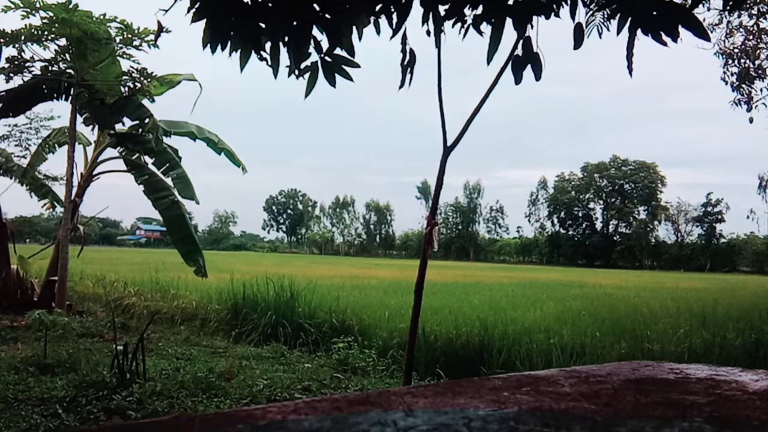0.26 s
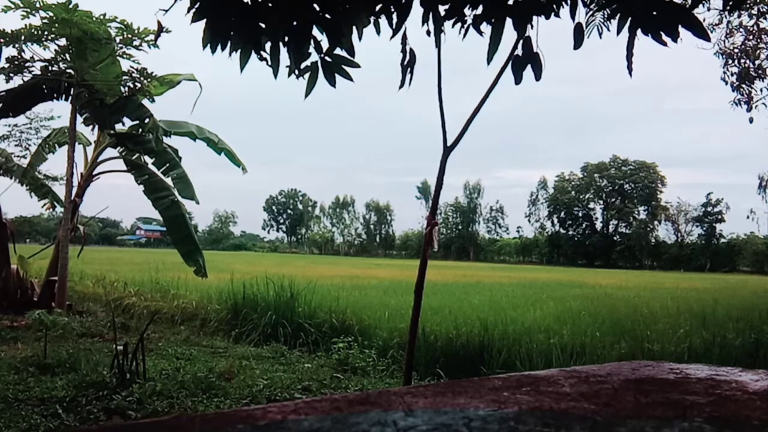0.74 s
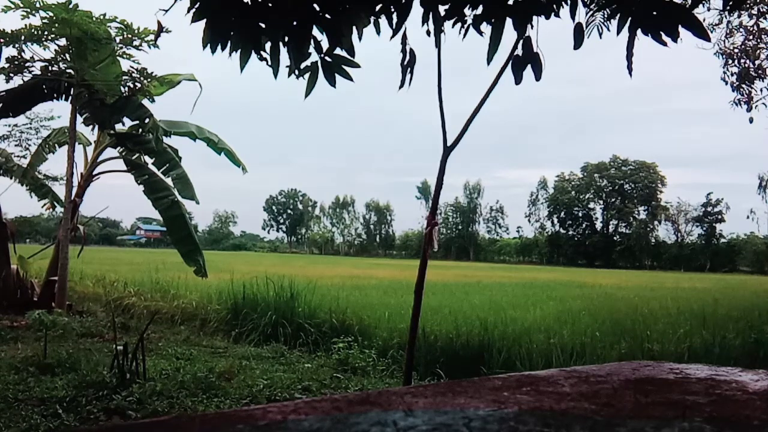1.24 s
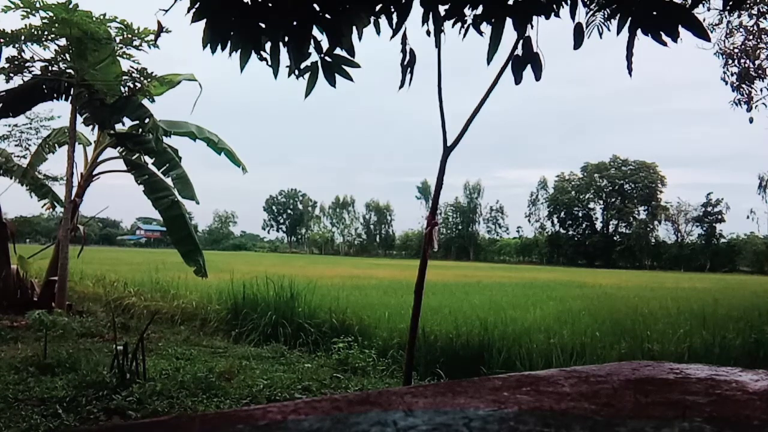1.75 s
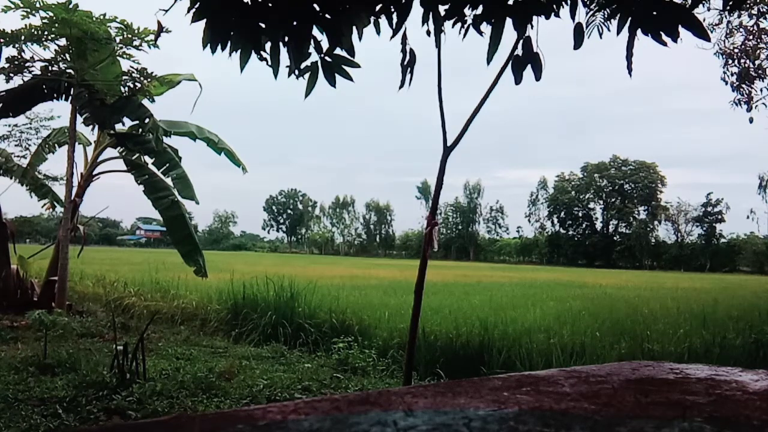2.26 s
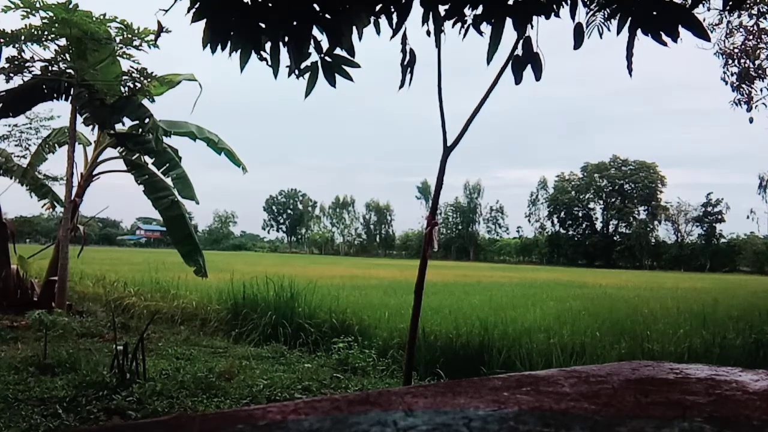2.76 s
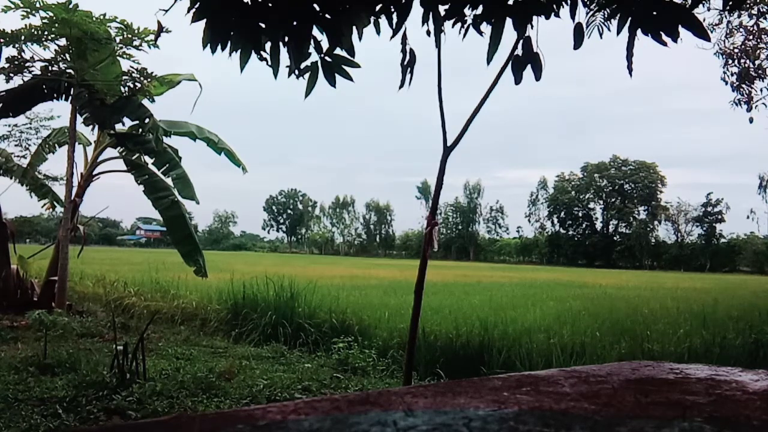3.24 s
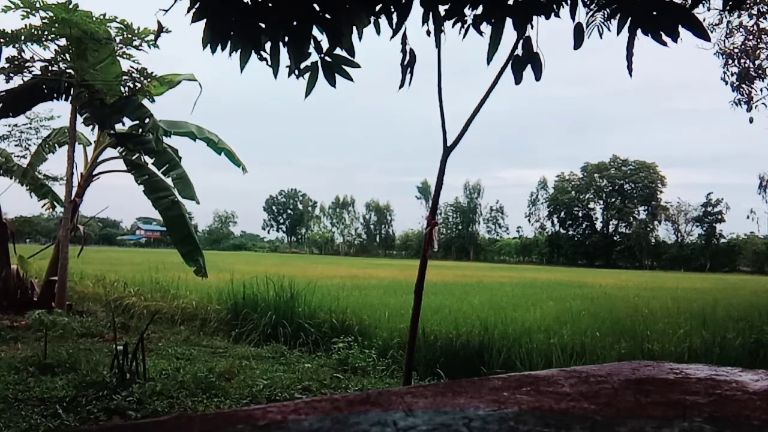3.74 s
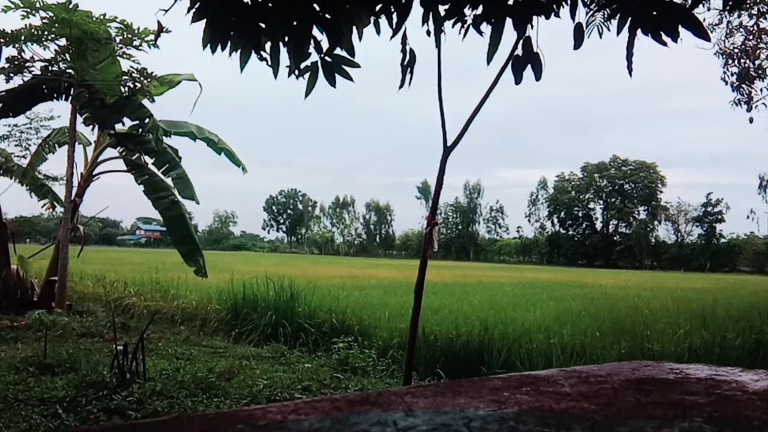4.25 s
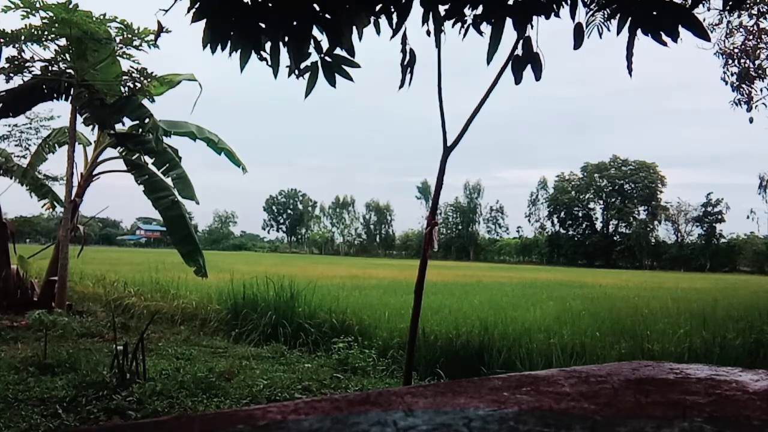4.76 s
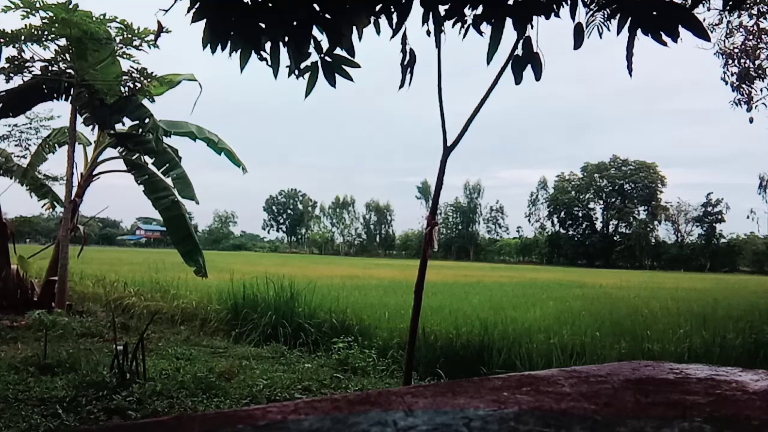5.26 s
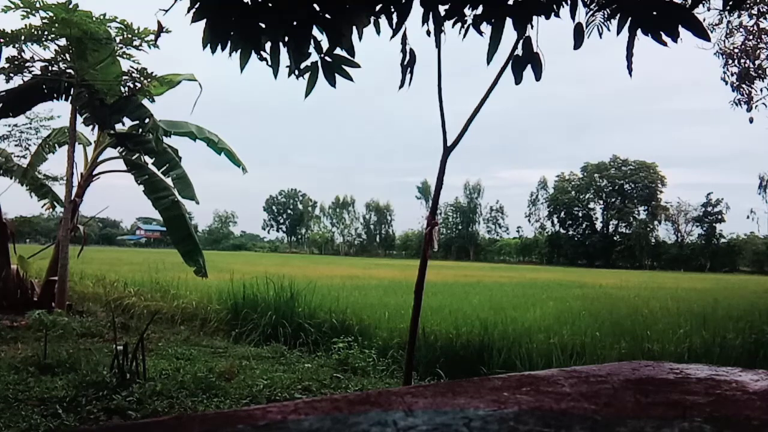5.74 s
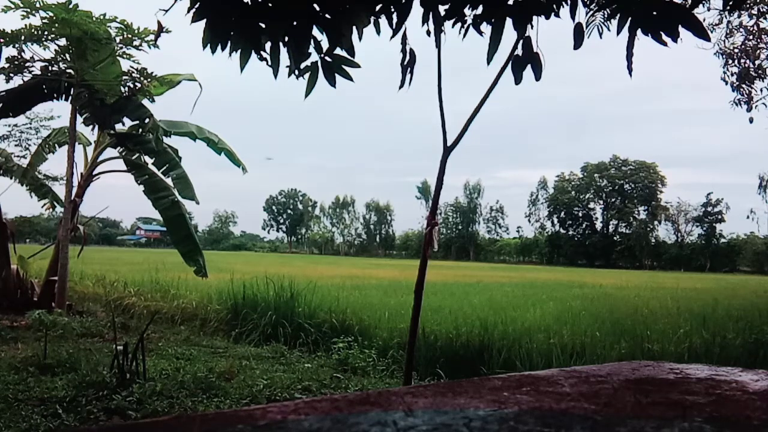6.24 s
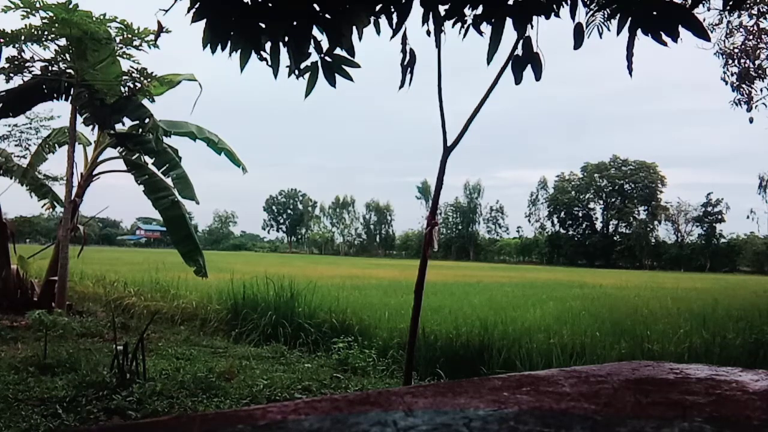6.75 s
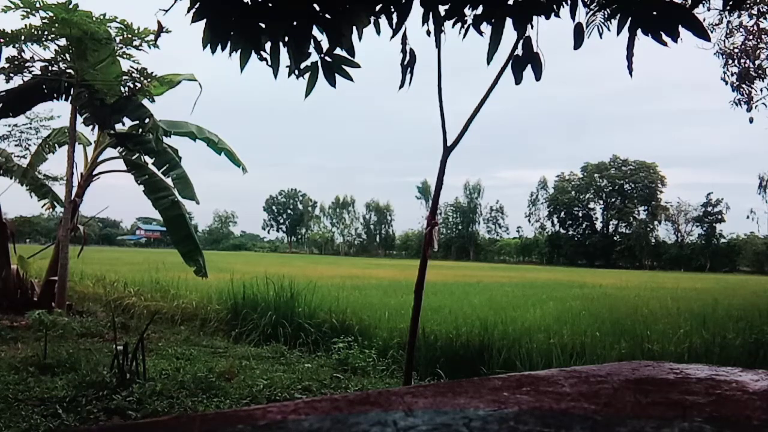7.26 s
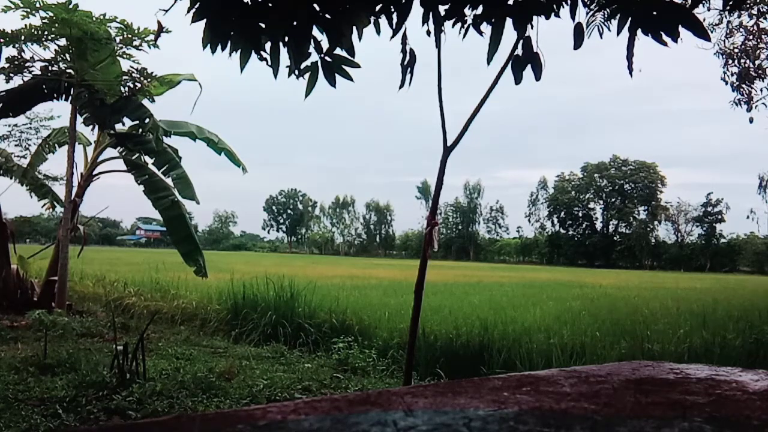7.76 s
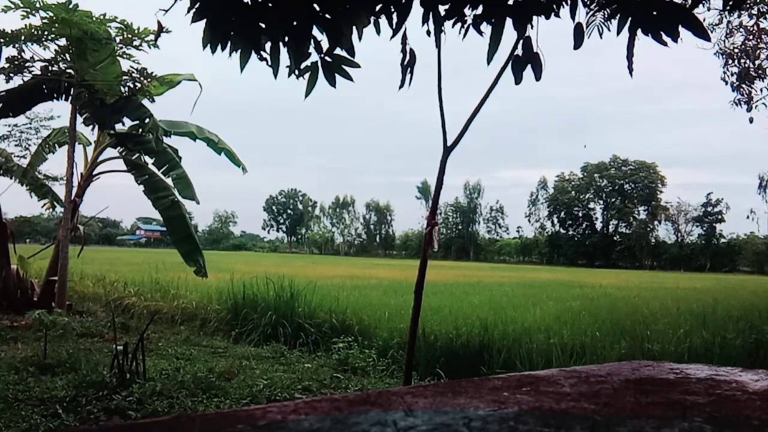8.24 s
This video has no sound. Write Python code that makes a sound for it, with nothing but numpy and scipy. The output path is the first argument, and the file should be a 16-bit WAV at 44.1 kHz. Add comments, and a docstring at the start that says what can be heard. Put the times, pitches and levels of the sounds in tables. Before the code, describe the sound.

Whooping bird runs break into loud cries while a near bird chirps repeatedly, insects shimmer, distant birds chatter and hoarse clucks join to the end.

```python
"""Morning at the edge of a rice field: filtered noise for air and insects, a wavering tone for a far engine.
From the start a bird whoops in a slowing run of swept tones, far birds whistle and chatter (noise bands),
and a near bird begins its rough three-step chirps. Cries end the run and a cricket trills; then a katydid
throbs and pips lead to a second run and more cries. Thumps and scuffs fall close by, and a clucking bird
joins to the end. Sparse decaying echoes from leaves and tree line scatter the calls."""
import sys
import numpy as np
from scipy import signal
from scipy.fft import rfft, irfft
from scipy.io import wavfile
from scipy.ndimage import map_coordinates

SR = 44100
rng = np.random.default_rng(int(sys.argv[2]) if len(sys.argv) > 2 else 0)


def transcribe(signal):
    """Save signal, clipped to [-1, 1], as a 16-bit WAV file at the path in sys.argv[1]."""
    frames = np.atleast_2d(signal).T
    limited = np.clip(frames, -1, 1)
    pcm = np.round(limited * 32767).astype(np.int16)
    wavfile.write(sys.argv[1], SR, pcm)


N = 374850
TIME = np.arange(N) / SR


def undb(db):
    """Logarithmic level: decibels to amplitude gain."""
    return 10 ** (np.asarray(db) / 20)


def unit(x):
    """Normalisation: scale to rms 1."""
    return x / np.sqrt(np.mean(x ** 2) + 1e-20)


def add(out, s, x):
    """Superposition: mix x into out from time s."""
    i = max(int(s * SR), 0)
    out[i:i + len(x)] += x[:max(len(out) - i, 0)]


def walk(rate, size=N):
    """Band-limited modulation: smooth random wander of spread near 1, with rate knots a second."""
    knots = rng.standard_normal(4096)
    return map_coordinates(knots, [np.arange(size) / SR * rate], order=2, mode="wrap")


def bout(start_s, end_s, fade_s):
    """Trapezoidal envelope: fade in, hold, fade out."""
    return np.clip(np.minimum(TIME - start_s, end_s - TIME) / fade_s, 0, 1)


def coloured(points):
    """Spectral shaping: white noise weighted by a (f/Hz, level/dB) curve, at rms 1."""
    hz, db = np.transpose(points)
    f = np.fft.rfftfreq(N, 1 / SR) + 1e-3  # keeps the logarithm finite at 0 Hz
    gain = undb(np.interp(np.log(f), np.log(hz), db, left=-120, right=-120))
    return unit(irfft(rfft(rng.standard_normal(N)) * gain, N))


def restless(points, sway_db, rate):
    """Independent band modulation: nine log-spaced bands of coloured noise each swell and fade alone."""
    spectrum = rfft(coloured(points))
    f = np.fft.rfftfreq(N, 1 / SR)
    edges = np.geomspace(points[0][0], points[-1][0], 10)
    out = np.zeros(N)
    for low, high in zip(edges, edges[1:]):
        band = irfft(spectrum * ((f >= low) & (f < high)), N)
        out += band * undb(sway_db * walk(rate))
    return unit(out)


def tone(hz):
    """Frequency modulation: a sine whose phase is the integral of a pitch track."""
    return np.sin(2 * np.pi * np.cumsum(hz) / SR)


def scatter(x, t60, wet_db, gap_s, count):
    """Multiple scattering: direct sound plus echoes from leaves and trunks that fall 60 dB over t60."""
    where = rng.random(count)  # delay as a share of t60
    size = rng.standard_normal(count)
    echoes = np.zeros(2 * SR)
    delays = np.clip((gap_s + where * t60) * SR, 1, len(echoes) - 1).astype(int)
    np.add.at(echoes, delays, size * np.exp(-np.log(1000) * where))
    echoes /= np.linalg.norm(echoes)
    return x + undb(wet_db) * signal.fftconvolve(x, echoes)[:len(x)]


def slurs(rows, rough):
    """Frequency glide: whistled notes that bend along a parabola through three pitches."""
    out = np.zeros(N)
    for s, length, start_hz, middle_hz, end_hz, db in rows:
        u = np.linspace(0, 1, int(length * SR))
        hz = np.polyval(np.polyfit([0, .5, 1], [start_hz, middle_hz, end_hz], 2), u)
        whistle = tone(hz * (1 + rough * walk(250, size=len(u))))
        add(out, s, undb(db) * whistle * signal.windows.tukey(len(u), .6))
    return out


def glide(s, length, hz, change, db, bow=.42):
    """Proportional glide: a slur whose pitch changes by a share of itself, slowly at first."""
    return s, length, hz, hz * (1 + bow * change), hz * (1 + change), db


def rasps(rows):
    """Resonance: bursts of noise through one band-pass that swell quickly and fade."""
    out = np.zeros(N)
    for s, length, hz, width_hz, db in rows:
        u = np.linspace(0, 1, int(length * SR))
        edges = [max(hz - width_hz / 2, 30), hz + width_hz / 2]
        band = signal.butter(3, edges, "bandpass", fs=SR, output="sos")
        noise = signal.sosfilt(band, rng.standard_normal(SR))[-len(u):]  # the settled end
        swell = np.sin(np.pi * u ** 0.6) * undb(2.7 * walk(150, size=len(u)))
        add(out, s, undb(db) * unit(noise * swell))
    return out


# noise spectra of low rumble, field murmur and hiss: (f/Hz, relative level/dB per Hz)
LOW_AIR = [(18, -37.5), (30, -19.5), (42, -21), (60, -4.5), (112, -1.5), (160, -2), (190, -6), (235, -7),
           (270, -13.5), (320, -18), (380, -25.5), (600, -36.5)]
FIELD_AIR = [(300, -21), (480, -24.5), (690, 1), (950, 1.5), (1400, -2.5), (1800, -5.5), (2300, 0),
             (2850, 5), (3400, -3.5), (4000, -14.5), (5200, -36)]
HISS = [(4710, -40), (8000, -1), (8670, -6), (9110, -10), (9570, -7), (10700, -2), (12000, -10),
        (15400, -9)]
# drone of the distant engine: (t/s, level/dB of the fundamental before its flutter)
ENGINE = [(0, -59.5), (1.2, -48.5), (2.5, -60.5), (3.2, -51), (4.2, -66), (5.4, -49.5), (6.1, -53.5),
          (7, -49), (8.5, -52.5)]
LOW_DB, MURMUR_DB, HISS_DB = -53, -59.5, -85.5  # rms levels


def background():
    """Harmonic drone over broadband noise: far engine, low rumble, murmur of the field and faint hiss."""
    firing_hz = 116.4 * (1 + 0.03984 * walk(14))
    fundamental = tone(firing_hz) * undb(1.3 * walk(8.2))
    second = undb(-10) * tone(2 * firing_hz) * undb(2.8 * walk(7.7))
    engine = (fundamental + second) * undb(np.interp(TIME, *np.transpose(ENGINE)))
    rumble = restless(LOW_AIR, sway_db=1.3, rate=7) * undb(LOW_DB)
    field = restless(FIELD_AIR, sway_db=4.5, rate=8) * undb(MURMUR_DB)
    return engine + rumble + field + coloured(HISS) * undb(HISS_DB)


# noise spectrum of the insect chorus: (f/Hz, relative level/dB per Hz)
INSECTS = [(2240, -27.5), (3800, -11.5), (3890, -7), (4060, -4), (4530, 1.5), (4700, 5.5), (4910, 2),
           (5360, -19.5), (5560, -25.5), (6210, -23), (6620, -9), (6990, -3.5), (7330, -9), (7760, -46),
           (8500, -35), (11000, -68.5), (18700, -120)]
# gains before the stroke envelopes (the chorus also wavers)
INSECT_DB, KATYDID_DB, CRICKET_DB = -60.5, -88.5, -58.5


def insects():
    """Amplitude modulation by wing strokes: shrill chorus, throbbing katydid, one brief cricket trill."""
    chorus = coloured(INSECTS) * undb(INSECT_DB + 1.7 * walk(7) + 1.6 * walk(45))
    throb = np.abs(tone(4.15 * (1 + 0.023 * walk(5))))  # two wing strokes a cycle
    katydid = coloured([(7900, -1), (8900, 9.0), (9800, -11.0)]) * throb * undb(2 * walk(7.3))
    katydid *= undb(KATYDID_DB) * bout(start_s=2.5, end_s=5.8, fade_s=0.21)
    strokes = tone(14 * (1 + 0.03 * walk(6.7))) ** 2  # squaring doubles the rate too
    cricket = coloured([(4100, -23), (4450, 4), (4800, -11)]) * strokes
    cricket *= undb(CRICKET_DB) * bout(start_s=1.47, end_s=2, fade_s=.07)
    return chorus + katydid + cricket


def flock(low_hz, high_hz, bend, spread_db, count):
    """Diffuse field: many far birds as short slurs at random times and pitches, mostly echo, at rms 1."""
    rows = []
    for when, pitch, length, start, end, size in rng.random((count, 6)):
        hz = low_hz + (high_hz - low_hz) * pitch
        start_hz = hz * (1 + bend * (start - .5))
        end_hz = hz * (1 + bend * (end - .5))
        rows.append((when * N / SR, 0.0308 + 0.0838 * length, start_hz, hz, end_hz, spread_db * size))
    return unit(scatter(slurs(rows, rough=0.019), t60=.55, wet_db=6.5, gap_s=.01, count=1000))


# Levels in these four tables are before echoes and group gain.
# thin falling whistles: (t/s, length/s, start f/Hz, level/dB)
FALLING = [(0.074, 0.14, 3820, -56.5), (1.019, 0.19, 3860, -60), (1.869, 0.21, 3830, -62.5),
           (2.514, 0.2, 3840, -68), (3.491, 0.084, 3950, -58.5), (6.095, .22, 2455, -63),
           (6.521, 0.25, 2434, -60.5), (7.736, 0.12, 3540, -53)]
# rising whistles: (t/s, start f/Hz, level/dB)
RISING = [(3.86, 2230, -54), (4.13, 2240, -50.5), (4.44, 2326, -52.5), (4.6, 2970, -59), (6.93, 3120, -62),
          (8.32, 2870, -56.5)]
# roosters on far farms, only the strongest overtone carries: (t/s, length/s, start f/Hz, level/dB)
CROWS = [(1.02, .36, 866, -63), (5.08, 0.59, 1510, -73.5), (6.848, 0.43, 672, -64)]
# harsh chatter in the trees; the row near 8 s is a rasping tail of the near bird's last chirp: # (t/s,
# length/s, centre f/Hz, level/dB)
CHATTER = [(.52, 0.7, 810, -64), (0.817, 0.069, 2660, -55), (1.397, 0.29, 1380, -61),
           (3.537, 0.053, 2560, -58.5), (3.657, 0.12, 2730, -61.5), (3.764, 0.023, 2170, -53.5),
           (4.699, 0.064, 3380, -50.5), (5.605, .081, 3440, -57.5), (6.308, 0.048, 3340, -52),
           (6.666, .11, 3140, -53.5), (7.525, 0.21, 3250, -58), (8.008, .075, 2780, -56.5)]
WHISTLE_FALL, WHISTLE_RISE, CROW_SAG = 0.067, .22, 0.021  # shares of the start pitch
RISING_S = .165  # length of a rising whistle
CHATTER_WIDTH = 0.41  # bandwidth as a share of the centre frequency


def far_birds():
    """Reverberant blurring: whistles, crows and chatter behind the tree line, over a further chorus."""
    falling = [glide(s, length, hz, -WHISTLE_FALL, db) for s, length, hz, db in FALLING]
    rising = [glide(s, RISING_S, hz, WHISTLE_RISE, db) for s, hz, db in RISING]
    held = [glide(s, length, hz, -CROW_SAG, db) for s, length, hz, db in CROWS]
    harsh = [(s, length, hz, hz * CHATTER_WIDTH, db) for s, length, hz, db in CHATTER]
    whistles = slurs(falling, rough=.003) + slurs(rising, rough=.012)
    whistles = undb(1.0) * scatter(whistles, t60=0.37, wet_db=1.5, gap_s=0.011, count=1000)
    crows = undb(2.5) * scatter(slurs(held, rough=0.016), t60=0.6, wet_db=0.5, gap_s=0.011, count=1000)
    chatter = undb(2.5) * scatter(rasps(harsh), t60=0.38, wet_db=-1, gap_s=0.012, count=1000)
    whoops = flock(low_hz=893.4, high_hz=1298, bend=0.144, spread_db=5.5, count=180)
    whoops *= undb(-61.5) * bout(start_s=0, end_s=7.97, fade_s=0.48)
    twitter = flock(low_hz=2540, high_hz=3864, bend=0.2333, spread_db=5.0, count=260) * undb(-61.0)
    squawks = flock(low_hz=1335, high_hz=2534, bend=0.22, spread_db=4, count=160) * undb(-69)
    return whistles + crows + chatter + whoops + twitter + squawks


# soft thumps close by: (t/s, resonance f/Hz, level/dB before echoes)
THUMPS = [(3.65, 294, -46.5), (4.406, 350, -45.5)]
# soft scuffs close by: (t/s, length/s, level/dB before echoes)
SCUFFS = [(1.428, 0.21, -67.5), (1.743, .07, -62.5), (3.696, 0.13, -57), (4.415, 0.064, -56),
          (7.183, .15, -59), (7.366, 0.088, -56), (8.14, 0.058, -61.5)]
THUMP_S, THUMP_WIDTH_HZ = .068, 46
SCUFF_HZ, SCUFF_WIDTH_HZ = 530, 500
RUSTLE_S, RUSTLE_HZ, RUSTLE_WIDTH_HZ = 0.087, 393, 170
RUSTLE_DB, RUSTLE_SPREAD_DB = -71, 7.5  # mean level, largest departure either way


def bumps(count=16):
    """Damped resonance: dull thumps, scuffs and randomly timed faint rustles near the microphone."""
    thumps = [(s, THUMP_S, hz, THUMP_WIDTH_HZ, db) for s, hz, db in THUMPS]
    scuffs = [(s, length, SCUFF_HZ, SCUFF_WIDTH_HZ, db) for s, length, db in SCUFFS]
    rustles = []
    for when, size in rng.random((count, 2)):
        db = RUSTLE_DB + RUSTLE_SPREAD_DB * (2 * size - 1)
        rustles.append((when * N / SR, RUSTLE_S, RUSTLE_HZ, RUSTLE_WIDTH_HZ, db))
    return scatter(rasps(thumps + scuffs + rustles), t60=0.24, wet_db=-4, gap_s=0.00806, count=300)


# clucks: (t/s, level/dB before echoes and overall gain)
CLUCKS = [(3.97, -48), (4.243, -49.5), (4.51, -48), (4.776, -47), (5.069, -54), (5.335, -46), (5.584, -41),
          (5.855, -47.5), (6.148, -50), (6.427, -45), (6.718, -40), (7.122, -44.5), (7.29, -46.5),
          (7.536, -44), (7.826, -46.5), (8.139, -49), (8.367, -46.5)]


def clucking_bird():
    """Pitch jitter: short hoarse notes, three or four a second, each with a random bend."""
    rows = []
    for (s, db), bend_hz in zip(CLUCKS, rng.normal(0, 59, len(CLUCKS))):
        rows.append((s, .034, 720 + bend_hz, 715, 680 - bend_hz, db))
    calls = slurs(rows, rough=0.05)
    return undb(-3.5) * scatter(calls, t60=0.67, wet_db=-1.5, gap_s=.01, count=600)


WHOOP_LOW_HZ = 932.3  # where the scoop starts


def whoop(length, top_hz, sag_hz, rise_s, swell_s=0.011, last=0.64, flutter_db=0.4, rough=0.0086):
    """Coupled pitch and effort: a note scoops up to its top pitch, then sags as the effort fades."""
    t = np.arange(int(length * SR)) / SR
    scoop = (top_hz - WHOOP_LOW_HZ) * np.cos(np.pi / 2 * np.minimum(t / rise_s, 1)) ** 2
    hz = top_hz - scoop - sag_hz * (t / length) ** 3
    effort = np.interp(t, [0, swell_s, length], [1 / 2, 1, last]) * signal.windows.tukey(len(t), .2)
    flutter = undb(flutter_db * walk(97.5, size=len(t)))
    return flutter * effort * tone(hz * (1 + rough * walk(200, size=len(t))))


# each whoop is a little lower and longer than the last
WHOOP_TOP_HZ, WHOOP_TIRING_HZ, WHOOP_GROWTH_S = 1247, 4.37, .007


def whoop_run(start_s, gap_s, slowing_s, length, rise_s, sag_hz, db, count):
    """Progressive slowing: a series of whoops with widening gaps, each longer and lower than the last."""
    out = np.zeros(N)
    for k in range(count):
        s = start_s + k * gap_s + slowing_s * k * (k - 1) / 2
        top_hz = WHOOP_TOP_HZ - k * WHOOP_TIRING_HZ
        add(out, s, undb(db) * whoop(length + k * WHOOP_GROWTH_S, top_hz, sag_hz, rise_s))
    return out


# Levels in these three tables are before echoes and overall gain.
# runs: (t/s, first gap/s, growth of each gap/s, first length/s, scoop/s, sag f/Hz, level/dB)
WHOOP_RUNS = [(0.065, .209, .012, 0.1174, 0.0432, 71.2, -42.5),
              (2.913, .165, .0094, .105, 0.05, 140.5, -50.5)]
# short pips before the second run: (t/s, level/dB)
PIPS = [(2.5, -50), (2.631, -56.5), (2.73, -51.5), (2.82, -47.5)]
# loud cries that end a run: (t/s, length/s, top f/Hz, sag f/Hz, level/dB)
CRIES = [(1.598, .21, 1205, 97, -39), (1.8, 0.13, 1160, 115, -40.5), (1.989, 0.15, 1143, 196, -41),
         (4.281, 0.25, 1215, 129.6, -38.5), (4.53, 0.1245, 1149, 40, -42),
         (4.614, .155, 1149, 173.5, -39.5)]
BREAK_HZ, BREAK_ARCH_HZ, BREAK_S = 943, 45, .038  # the lower register at both ends of a cry
OPENING_BREAK_DB, CLOSING_BREAK_DB = 0.5, -4.5  # relative to the cry


def whooping_bird():
    """Register break: two runs of whoops lead to cries with a lower voice at both ends."""
    out = sum(whoop_run(*run, count=7) for run in WHOOP_RUNS)
    out += slurs([(s, .06, 1060, 1110, 1110, db) for s, db in PIPS], rough=0.028)
    arch = (BREAK_HZ - BREAK_ARCH_HZ, BREAK_HZ, BREAK_HZ - BREAK_ARCH_HZ)
    for s, length, top_hz, sag_hz, db in CRIES:
        add(out, s, undb(db) * whoop(length, top_hz, sag_hz, rise_s=0.0344))
        opening = (s, BREAK_S, *arch, db + OPENING_BREAK_DB)
        closing = (s + length - BREAK_S, BREAK_S, *arch, db + CLOSING_BREAK_DB)
        out += slurs([opening, closing], rough=0.038)
    nearby = undb(-3.5) * scatter(out, t60=0.15, wet_db=-2.0, gap_s=0.004043, count=100)
    return scatter(nearby, t60=1.1, wet_db=-11, gap_s=0.033, count=1200)


def note(shape, scale, rough=0.0622, flutter_db=2.5, second_db=-52, third_db=-56, air_db=-52):
    """Source of the syrinx: a fluttering fundamental, faint overtones and a trace of air noise."""
    s, hz, db = np.transpose(shape)
    t = np.arange(s[0], s[-1], 1 / SR)
    swell_db = np.interp(t, s, db)
    unrest = rough * np.clip(1 - undb(swell_db - db.max()) / 2, 0, 1)  # the pitch steadies at the crest
    pitch = np.interp(t, s, hz) * scale * (1 + unrest * walk(692.6, size=len(t)))
    second = undb(second_db) * tone(2 * pitch)
    third = undb(third_db) * tone(3 * pitch) * (3 * pitch < SR / 2)  # silent above half the sample rate
    air = undb(air_db) * rng.standard_normal(len(t))
    level = undb(swell_db + flutter_db * walk(327, size=len(t)))
    return (tone(pitch) + second + third + air) * level * signal.windows.tukey(len(t), .1)


# chirps: (t/s of the middle note, first level/dB, middle level/dB, last level/dB, first f/Hz, last f/Hz)
# levels add to those of the note shapes, before CHIRP_DB
CHIRPS = [(0.646, -23, -27.5, -32, 5070, 3300), (1.394, -23, -29, -34.5, 4950, 3510),
          (2.226, -24, -27.5, -27.5, 4960, 3290), (3.12, -26.5, -26.5, -35, 5060, 3340),
          (4.171, -28, -30.5, -33, 4905, 3424), (4.897, -22.5, -31.5, -34, 5040, 3420),
          (5.818, -26, -31.5, -30, 4900, 3500), (6.481, -24.5, -30, -30.5, 5030, 3624),
          (7.377, -22.5, -26.5, -30, 5020, 3494), (7.975, -21, -25.5, -31.5, 4990, 3420)]
# note shapes: (t/s from the middle note, f/Hz before scaling, relative level/dB)
FIRST_NOTE = [(-.082, 7500, -51.5), (-.07, 6630, -43.5), (-.06, 5800, -32.5), (-.052, 4913, -18),
              (-.045, 4500, -14), (-.03, 4916, -10.5), (-.022, 5250, -22), (-.016, 5350, -39)]
MIDDLE_NOTE = [(-.021, 4990, -16), (-.016, 3946, -9), (-.009, 4351, -19), (-.002, 4360, 0),
               (.005, 4633, -5), (.012, 4293, -17), (.02, 3490, -18)]
LAST_NOTE = [(.018, 4663, -16.5), (.023, 3758, -6.5), (.029, 3070, -14), (.036, 3333, -4.5),
             (.046, 3550, -8.5), (.058, 3600, -26)]
CHIRP_DB = 3.5  # gain of each note together with its near echoes


def near_bird():
    """Multiple scattering: three rough notes step down, each with its own scattered echoes."""
    out = np.zeros(N)
    for s, first_db, middle_db, last_db, first_hz, last_hz in CHIRPS:
        # the first and last f/Hz set the pitch at one point of each shape
        first = undb(first_db) * note(FIRST_NOTE, first_hz / FIRST_NOTE[5][1], rough=.065, third_db=-50)
        middle = undb(middle_db) * note(MIDDLE_NOTE, 1 + .012 * rng.standard_normal())
        last = undb(last_db) * note(LAST_NOTE, last_hz / LAST_NOTE[3][1])
        for shape, sung in ((FIRST_NOTE, first), (MIDDLE_NOTE, middle), (LAST_NOTE, last)):
            padded = np.pad(sung, (0, SR // 2))  # room for the echoes
            heard = scatter(padded, t60=.29, wet_db=1.4, gap_s=.002, count=300)
            heard *= np.linalg.norm(sung) / np.linalg.norm(heard)  # keeps the energy of the note
            add(out, s + shape[0][0], undb(CHIRP_DB) * heard)
    return scatter(out, t60=0.73, wet_db=-33, gap_s=0.028, count=2000)


def scene():
    """Superposition: all sources add at one microphone."""
    surroundings = background() + insects() + far_birds() + bumps()
    return (surroundings + clucking_bird() + whooping_bird() + near_bird())[None]


def record(dry):
    """Low-pass filtering: the recorder cuts the top with a steep elliptic filter."""
    return signal.sosfilt(signal.ellip(10, .1, 70, 15550, fs=SR, output="sos"), dry)


dry = scene()
out = record(dry)
transcribe(out)
```